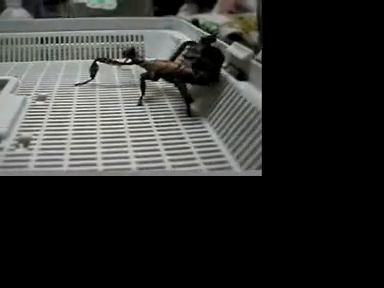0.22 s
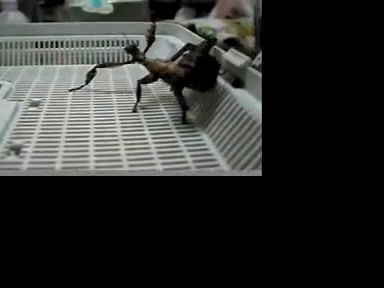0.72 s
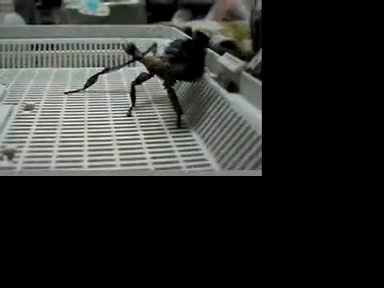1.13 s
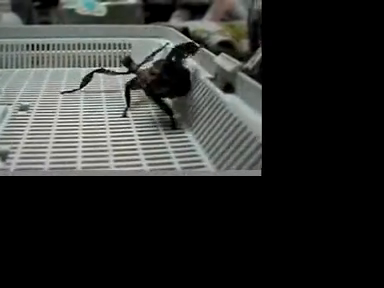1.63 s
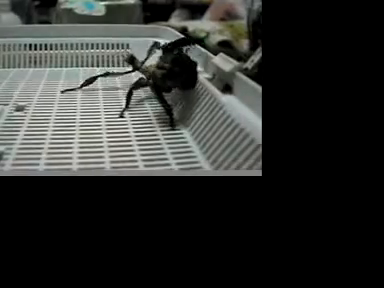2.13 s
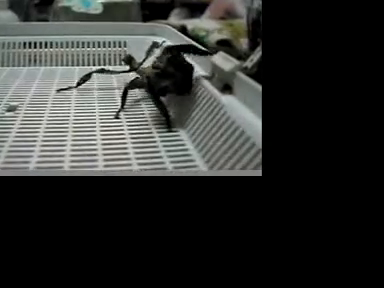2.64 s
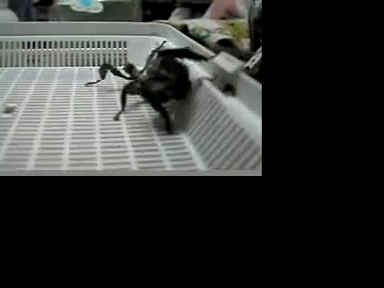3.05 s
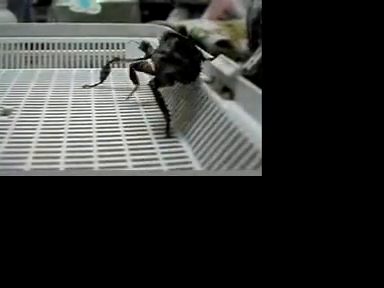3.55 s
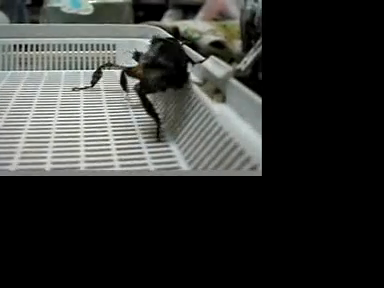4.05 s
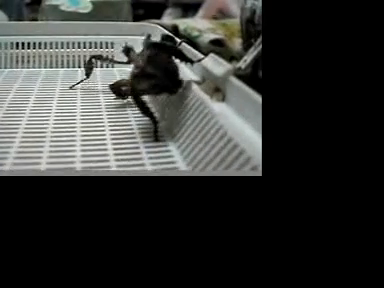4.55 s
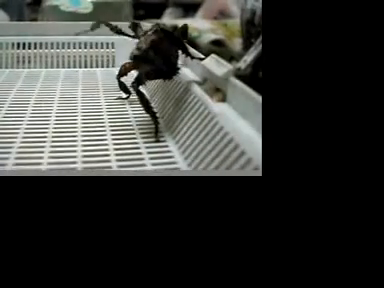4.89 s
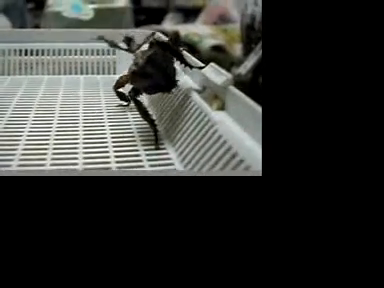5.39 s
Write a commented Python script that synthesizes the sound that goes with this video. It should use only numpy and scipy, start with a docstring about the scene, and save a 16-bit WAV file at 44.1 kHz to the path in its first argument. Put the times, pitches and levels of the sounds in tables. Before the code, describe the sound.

A busy chorus of short, purring frog trills over faint outdoor air sinks away to almost nothing, then swells back and continues.

```python
"""In a town at night, many small frogs trill some way off over a soft hush and a faint mains hum.
Each call is a train of short pulses ringing the vocal sac near 2 kHz; most climb in pitch and swell.
Long trills and short notes overlap, with rasp, echoes and a few faint, short stray tones.
The whole sound fades out in the middle, leaving only a trace of hiss, and comes back quickly.
"""
import sys
import numpy as np
from scipy import signal
from scipy.fft import rfft, irfft
from scipy.io import wavfile
from scipy.ndimage import uniform_filter1d

SR = 44100
rng = np.random.default_rng(int(sys.argv[2]) if len(sys.argv) > 2 else 0)


def persist_wave(psi):
    """Save psi, clipped to +-1, as 16-bit WAV."""
    counts = np.round(np.clip(psi, -1, 1) * 32767).astype(np.int16)
    wavfile.write(sys.argv[1], SR, np.atleast_2d(counts).T)


N = 249606

# Calls of the near frogs, with levels before the common trim NEAR_TRIM_DB:
# start_s, end_s, pulses_per_s, middle_pitch_hz, climb_hz, full_level_db, swell_db, left_minus_right_db
NEAR_CALLS = [(0.002, 0.089, 82, 1880, 29, -31.5, 0.5, -3.5), (0.056, 0.139, 95, 1823, 228, -25, 13.5, 1.5),
              (0.09, 0.167, 88, 2003, 53, -29, 2, -5), (0.155, 0.191, 94, 1733, 53, -24.5, 3.5, 14.5),
              (0.244, 0.284, 100, 2008, 168, -22, 8.5, -4), (0.273, 0.303, 115, 1798, 81, -27, -3.5, 13.5),
              (0.328, 0.464, 82, 1750, 190, -29, 2, -0.5), (0.386, 0.451, 78, 1950, 63, -42, 0, -2.5),
              (0.476, 0.487, 91, 1910, 42, -26.5, -0.5, -5), (0.504, 0.538, 88, 1860, 105, -23, 2.5, -3.5),
              (0.567, 0.577, 104, 1980, 1, -27.5, 5, 0), (0.602, 0.615, 83, 2060, -1.5, -22.5, 0.5, -2.5),
              (0.605, 0.651, 65, 1953, 31.5, -30.5, -4.5, 1), (0.704, 0.838, 82, 1930, 138, -29, 3.5, -3),
              (0.869, 0.881, 83, 1770, 0.5, -38, 0, -1), (0.885, 0.935, 80, 2080, 80.5, -46, 2, -0.5),
              (0.906, 0.968, 81, 1720, 2, -34.5, 5.5, 1), (0.981, 1.029, 83, 1815, 144.5, -27.5, 2.5, -2),
              (1.049, 1.101, 58, 1790, 38, -39.5, 0, -6), (1.112, 1.13, 56, 1915, 81, -22, 11.5, -1.5),
              (1.143, 1.166, 130, 1975, 48, -28, 0.5, -8.5), (1.191, 1.225, 59, 1860, 1, -34, 3.5, -2),
              (1.243, 1.345, 80, 1692, 198, -29, 7, -1), (1.256, 1.359, 78, 1953, 32, -25, 6.5, -2.5),
              (1.382, 1.424, 95, 2070, 82, -26.5, 6.5, -3.5), (1.431, 1.457, 77, 1840, 51, -25.5, -0.5, -2),
              (1.46, 1.493, 91, 2045, 3, -28, -4.5, -0.5), (1.617, 1.733, 78, 1827, 130, -27.5, 3.5, -1),
              (1.649, 1.73, 85, 1950, 183, -27, 6.5, -3), (1.757, 1.828, 79, 1920, 80, -29, 3, -3),
              (1.836, 1.862, 77, 2083, 98, -20, 5.5, -2.5), (2.002, 2.1, 82, 1802, 199, -26.5, 9, -3.5),
              (2.124, 2.174, 80, 1860, -60.5, -44, 10, -1.5), (2.202, 2.239, 81, 1992, 99, -25.5, -2, -0.5),
              (2.26, 2.349, 90, 1935, 181, -30, 14, -2.5), (2.354, 2.467, 80, 1745, 60, -26.5, 9, -1.5),
              (2.43, 2.453, 87, 2038, 59.5, -26, 4, -2.5), (3.066, 3.09, 80, 1700, 2, -35.5, 3.5, 0.5),
              (3.105, 3.218, 80, 1738, 279, -23.5, 9.5, -2), (3.237, 3.265, 70, 1780, -28, -46, -1, -1),
              (3.281, 3.318, 81, 1820, 89, -23.5, 6.5, -2.5), (3.322, 3.353, 97, 1990, 81.5, -25, -0.5, 1),
              (3.488, 3.662, 81, 1826, 180, -28.5, 8, -2.5), (3.535, 3.589, 122, 1970, 72, -27.5, 0.5, -2),
              (3.673, 3.692, 102, 2050, 3, -26.5, -2, -4), (3.704, 3.713, 103, 2088, 1, -22.5, -2.5, -2),
              (3.724, 3.773, 82, 2010, 134, -27, 5, -2.5), (3.795, 3.84, 88, 2100, -110, -42.5, 6.5, -4.5),
              (3.861, 3.885, 83, 1680, -3, -54, 5, 2), (3.964, 4.116, 26, 1850, -5, -34.5, 8, 2),
              (4.123, 4.236, 81, 1678, 183, -30, 9.5, 0.5), (4.148, 4.199, 80, 1940, 12, -25, 3.5, -1),
              (4.24, 4.276, 56, 1915, 37, -32.5, -1, -4.5), (4.296, 4.33, 113, 2032, 29, -31, -10.5, 0),
              (4.32, 4.348, 71, 1867, 64, -24, 1.5, 0), (4.41, 4.474, 92, 1910, 189.5, -32, 3.5, -1),
              (4.467, 4.554, 80, 1815, 199.5, -27, 9.5, -0.5),
              (4.557, 4.588, 97, 2065, 30.5, -28.5, 0.5, -2), (4.645, 4.675, 100, 1976, 99, -24, 3, -3.5),
              (4.685, 4.824, 79, 1873, 81, -31, -3, -0.5), (4.836, 4.886, 80, 1995, 132, -27, 3, -1),
              (4.97, 5.058, 80, 1903, 129, -26, 8.5, -2.5), (5.065, 5.124, 69, 1907, 30.5, -29, 3.5, -2.5),
              (5.144, 5.16, 62, 1880, -3, -44.5, -6, 2), (5.174, 5.192, 109, 2094, 82.5, -24.5, -1, -2.5),
              (5.224, 5.322, 82, 1686, 220.5, -28, 11.5, -1), (5.24, 5.268, 72, 2070, -0.5, -27, -3.5, -2),
              (5.271, 5.314, 67, 1890, 34, -30, 2.5, 0), (5.326, 5.384, 102, 1990, -3, -35, -3, -4),
              (5.408, 5.45, 72, 1863, 62, -22, 2.5, -2), (5.443, 5.487, 90, 2055, 34, -28.5, -2, -4),
              (5.502, 5.524, 91, 2070, 92.5, -30, 9, -2), (5.587, 5.656, 72, 1710, 116, -35, 6, 0)]
# Partials of a pulse: multiple of the sac pitch (no unit)
PARTIAL_MULTIPLES = (.5, 1, 1.5, 2)
# Levels of those partials in a pulse of -30 dB: level_db
PARTIAL_LEVELS_DB = (-30.5, -0.5, -30, -44)
# Broad tone colour of the distant town air: pitch_hz, relative_level_db
AIR_SPECTRUM = [(30, -5.5), (80, -13), (160, -13.5), (260, -5.5), (340, -8), (550, -3.5), (920, -4.5),
                (1300, -3), (2900, -8.5), (4500, -15), (5600, -22), (8000, -30), (10000, -39.5),
                (11300, -58.5)]
# How alike the air sounds in the two channels: pitch_hz, correlation (no unit)
AIR_LIKENESS = [(40, 0.13), (250, 0.28), (900, 0.3), (2500, 0.013), (4500, 0.0076), (10000, 0.083)]
# Narrow peaks and dips that the surroundings give the air: pitch_hz, width_hz, level_db
AIR_COLOUR = [(207, 3.9, -4), (244, 5.6, 1), (308, 16, -7.5), (347, 22, 1), (422, 20, -1.5),
              (552, 14, -5.5), (635, 8.5, 3), (680, 14, -3.5), (850, 36, 2.5), (960, 47, 3.5),
              (1281, 45, -5), (2230, 89, -9), (3085, 59, -8), (3470, 6, 2.5), (3880, 26, 6),
              (4180, 14, -2.5), (4510, 30, 4.5)]
# Faint, short stray tones: middle_s, pitch_hz, half_length_s, level_db
STRAY_TONES = [(0.823, 4180, 0.0084, -53.5), (0.863, 1520, 0.0051, -43.5), (1.624, 265, 0.012, -59),
               (3.439, 452, 0.015, -64), (4.308, 4510, 0.11, -64.5), (4.533, 3470, 0.014, -52),
               (4.849, 466, 0.0075, -49)]

T = np.arange(N) / SR  # time in s
FREQS = np.arange(N // 2 + 1) * SR / N  # spectrum steps in Hz

# One pulse: rise and ring-down at a level of -30 dB, and how louder pulses stretch
RISE_S, RING_S, STRETCH_PER_DB = .0042, .007, .017
SAG_HZ, SAG_S = 60, .0035  # pitch slides from up to 60 Hz above to 60 Hz below its middle
# One call: share of it spent swelling, drop of the last pulse, level of the soft lead-in pulse
SWELL_SHARE, RELEASE_DB, LEAD_DB = 0.7, 2.5, -10
SCATTER_DB, SCATTER_HZ, JITTER_S = 1.3, 15, .0003  # how pulses differ within a call
BOUNCE_DB, BOUNCE_S = -15, (.0025, .010)  # each call's own reflections: level, range of delays
RASP_DB, RASP_HZ = -33, (800, 3417)  # breathy noise relative to the pulse outline, and its band
NEAR_TRIM_DB, FAR_DB = -1.08, -47.5
EDGE_HZ, EDGE_WIDTH_HZ, EDGE_DB = 2353, 51, -14.5  # dip just above the highest voices
AIR_DB, HUM_DB, HISS_DB = -49, -74.5, -84.5  # rms levels before fading or cutting the top
HUM_HZ, TOP_HZ = 60, 11200
RIGHT_LAG_S = 3.6e-5  # everything reaches the left channel first
FADE_OUT_S, FADE_IN_S = (1.2, 2.485), (2.97, 3.24)  # begins, ends


def undb(db):
    """Turn decibels into an amplitude gain."""
    return 10 ** (np.asarray(db) / 20)


def level(x, db):
    """Scale a sound to an rms level in dB."""
    return x * undb(db) / np.sqrt(np.mean(x ** 2))


def over_freq(points):
    """Join (Hz, value) points along a log-frequency axis."""
    hz, value = np.transpose(points)
    return np.interp(np.log(FREQS + 1), np.log(hz), value)


def delay(x, seconds):
    """Delay by any fraction of a sample by turning the phase of the spectrum."""
    return irfft(rfft(x) * np.exp(-2j * np.pi * FREQS * seconds), N)


def walk(rate):
    """Random levels, drawn `rate` times a second and joined by smooth slopes."""
    hold = int(SR / rate)
    steps = np.repeat(rng.standard_normal(N // hold + 1), hold)
    return uniform_filter1d(steps, hold)[:N]


def trill(start, end, rate, middle_hz, climb_hz, full_db, swell_db):
    """List (s, Hz, dB) for a call's pulses: soft lead-in, pitch climb, swell, hold and release."""
    pulse_count = max(2, int(round((end - start) * rate)) + 1)
    along = np.linspace(0, 1, pulse_count)
    along = np.append(-along[1], along)  # the lead-in pulse comes one step early
    db = full_db - swell_db * np.clip(1 - along / SWELL_SHARE, 0, 1)
    db = db + LEAD_DB * (along < 0) - RELEASE_DB * (along == 1)
    return np.transpose([start + along * (end - start), middle_hz + climb_hz * (along - .5), db])


def sac_pulse(t, hz, db, long, flare=0.3, length_scatter=0.32):
    """Ring the sac: a harder push holds the larynx open longer and brings out the side partials."""
    push_db = db + 30
    stretch = np.exp(STRETCH_PER_DB * push_db + length_scatter * np.tanh(long))
    rise, ring = RISE_S * stretch, RING_S * stretch
    inside = (t >= -rise) & (t <= ring)
    envelope = inside * np.cos(np.pi / 2 * t / np.where(t < 0, rise, ring)) ** 2
    # the pitch sags as the pressure is let out
    cycles = hz * t - SAG_HZ * SAG_S * np.log(np.cosh(t / SAG_S))
    tone = 0
    for multiple, partial_db in zip(PARTIAL_MULTIPLES, PARTIAL_LEVELS_DB):
        gain = undb(partial_db + flare * push_db * (multiple != 1))
        tone = tone + gain * np.sin(2 * np.pi * multiple * cycles)
    return undb(db) * envelope * tone


def add_call(out, call):
    """Add one call: slightly uneven pulses, each blurred by one short reflection per channel."""
    *shape, pan_db = call
    chance = rng.standard_normal(size=(40, 4))
    lags = (SR * rng.uniform(*BOUNCE_S, size=2)).astype(int)
    sides = undb(np.array([pan_db, -pan_db]) / 2)
    for (centre, hz, db), (late, loud, sharp, long) in zip(trill(*shape), chance):
        centre = centre + JITTER_S * late
        hz = hz + SCATTER_HZ * sharp
        db = db + SCATTER_DB * loud
        # a window wide enough for any pulse
        i = np.arange(max(0, int((centre - .02) * SR)), min(N, int((centre + .03) * SR)))
        pulse = sac_pulse(i / SR - centre, hz, db, long)
        for channel, side, lag in zip(out, sides, lags):
            channel[i] += side * pulse
            fits = i + lag < N
            channel[i[fits] + lag] += undb(BOUNCE_DB) * side * pulse[fits]


def near_frogs():
    """Closer frogs overlap each other; band noise follows the pulse outline as a little rasp."""
    out = np.zeros((2, N))
    for call in NEAR_CALLS:
        add_call(out, call)
    band = signal.butter(3, RASP_HZ, "band", fs=SR, output="sos")
    noise = signal.sosfilt(band, rng.standard_normal(N))
    outline = np.abs(signal.hilbert(out))
    rasp = outline * level(noise, RASP_DB)
    return (out + rasp) * undb(NEAR_TRIM_DB)


def far_frogs(count=170, low_hz=1700, high_hz=2070, climb_hz=170, swell_db=5, spread_db=5, pan_db=14):
    """Many calls further off, spread from side to side, each at its own random pitch and pace."""
    out = np.zeros((2, N))
    for k, (when, length, size, distance, side, pace) in enumerate(rng.random((count, 6))):
        start = (k + when) / count * (N / SR + .15) - .15  # the first may begin before the sound does
        end = start + 0.055 + .14 * length
        rate = 70 + 30 * pace
        middle_hz = low_hz + size * (high_hz - low_hz)
        call_db = -23.5 - spread_db * distance  # sets tone and balance; FAR_DB sets the sum
        call_pan_db = pan_db * (2 * side - 1)
        add_call(out, (start, end, rate, middle_hz, climb_hz, call_db, swell_db, call_pan_db))
    return level(out, FAR_DB)


def surroundings(x, left_echo_s=.0062, right_echo_s=.0049, echo_db=-13.5, tail_db=-12.5, t60=0.33):
    """A hard surface throws the calls back; nearby walls scatter them into a short noise-like tail."""
    t = T[:SR // 2]
    # t60 is the time in s for the tail to fall by 60 dB
    tail = rng.standard_normal((2, len(t))) * undb(-60 * t / t60) * (t > .003)
    tail /= np.sqrt(np.sum(tail ** 2, axis=1, keepdims=True))
    echo = delay(x, np.array([[left_echo_s], [right_echo_s]]))
    scattered = signal.fftconvolve(x, tail, axes=1)[:, :N]
    return x + undb(echo_db) * echo + undb(tail_db) * scattered


def chorus():
    """Near and far frogs in their surroundings, with a narrow dip above the highest voices."""
    frogs = surroundings(near_frogs() + far_frogs())
    edge_db = EDGE_DB * np.exp(-.5 * ((FREQS - EDGE_HZ) / EDGE_WIDTH_HZ) ** 2)
    return irfft(rfft(frogs) * undb(edge_db), N)


def flicker(x, depth_db=5.0, treble_db=2, size=2048):
    """Narrow bands swell and sink on their own; the lowest bass and the treble stay smoother."""
    hz, _, bands = signal.stft(x, SR, nperseg=size)
    chance = rng.standard_normal(bands.shape[1:])
    chance = uniform_filter1d(chance, size=3, axis=0)  # across pitch
    chance = uniform_filter1d(chance, size=4, axis=1)  # across time
    spread_db = np.interp(hz, (100, 300, 3500, 6000), (treble_db, depth_db, depth_db, treble_db))
    db = spread_db[:, None] * chance / chance.std()
    return signal.istft(bands * undb(db), SR, nperseg=size)[1][:, :N]


def air(waver_db=1, grain_db=0.44, low_pan_db=4.5):
    """Shaped noise makes a wide, wavering hush; its murmur leans left and its deepest part right."""
    mid, side = rfft(rng.standard_normal((2, N)))
    alike = np.clip(over_freq(AIR_LIKENESS), -.95, .95)
    sign = np.array([[1], [-1]])  # left, right
    stereo = mid * np.sqrt(1 + alike) + sign * side * np.sqrt(1 - alike)
    # left minus right: (Hz, dB)
    pan_db = over_freq([(30, -2.5), (170, -8.5), (250, low_pan_db), (600, low_pan_db), (1300, 1.2)])
    colour_db = over_freq(AIR_SPECTRUM)
    for hz, width, db in AIR_COLOUR:
        colour_db = colour_db + db * np.exp(-.5 * ((FREQS - hz) / width) ** 2)
    hush = irfft(stereo * undb(colour_db + sign * pan_db / 2), N)
    waver = undb(waver_db * walk(9) + grain_db * walk(70))  # slow and quick level changes
    return level(flicker(hush) * waver, AIR_DB)


def mains_hum():
    """A faint low sine tone whose level wavers at random."""
    return level(np.sin(2 * np.pi * HUM_HZ * T) * undb(6 * walk(36)), HUM_DB)


def stray_tones():
    """Faint, short sine tones with bell-shaped outlines that barely rise out of the hush."""
    out = np.zeros(N)
    for middle, hz, half_length, db in STRAY_TONES:
        outline = np.exp(-.5 * ((T - middle) / half_length) ** 2)
        out += undb(db) * outline * np.sin(2 * np.pi * hz * T)
    return out


def scene():
    """Frogs, town air, hum and stray tones, reaching the right channel a moment after the left."""
    channels = chorus() + air() + mains_hum() + stray_tones()
    return delay(channels, np.array([[0], [RIGHT_LAG_S]]))


def record(dry, hiss_tilt=0.36):
    """Fade slowly out and quickly in again over a trace of thin hiss, then cut the top."""
    gain = np.interp(T, FADE_OUT_S, (1, 0)) + np.interp(T, FADE_IN_S, (0, 1)) ** 2
    thin_noise = signal.lfilter([1, -hiss_tilt], 1, rng.standard_normal((2, N)))
    hiss = level(thin_noise, HISS_DB)
    top_cut = signal.ellip(8, .2, 70, TOP_HZ, fs=SR, output="sos")
    return signal.sosfilt(top_cut, dry * gain + hiss)


dry = scene()
out = record(dry)
persist_wave(out)
```